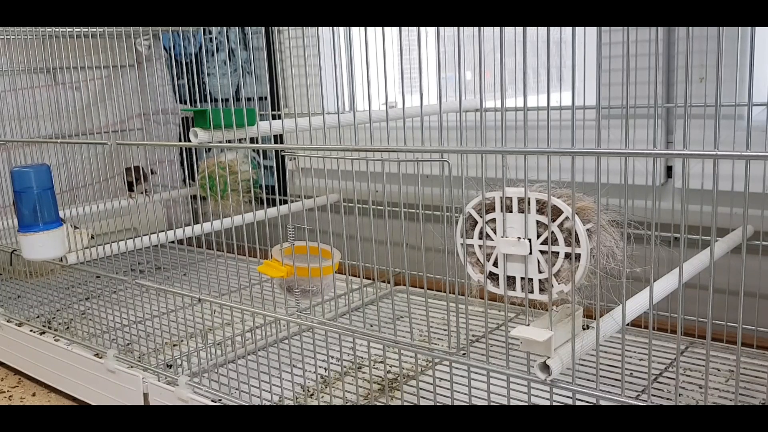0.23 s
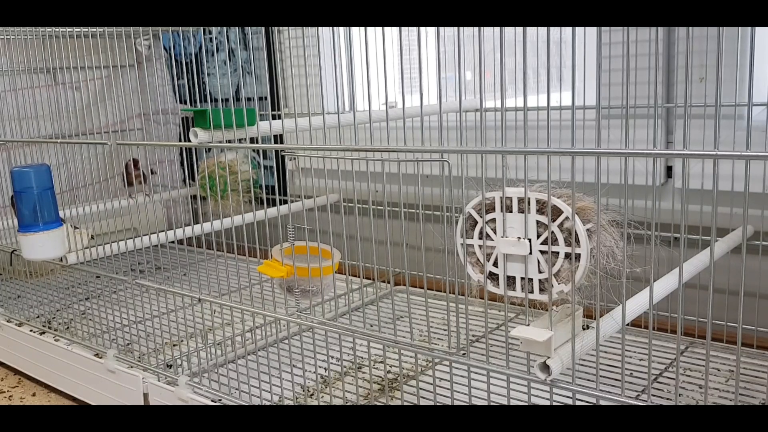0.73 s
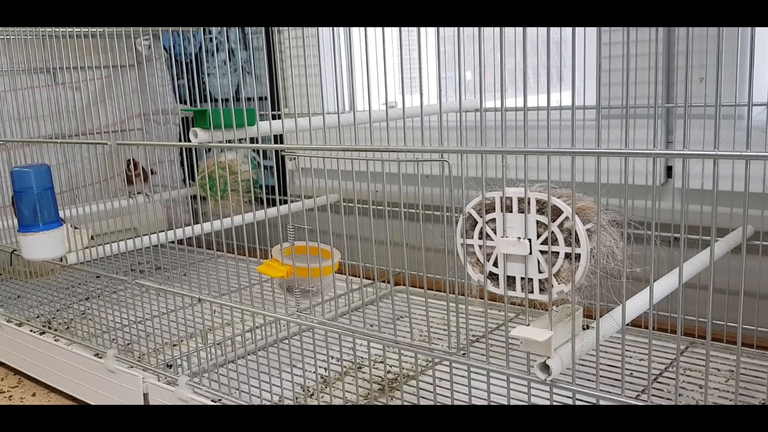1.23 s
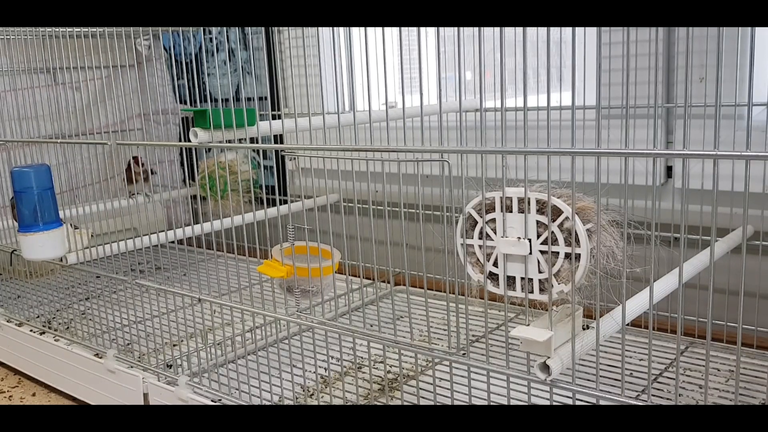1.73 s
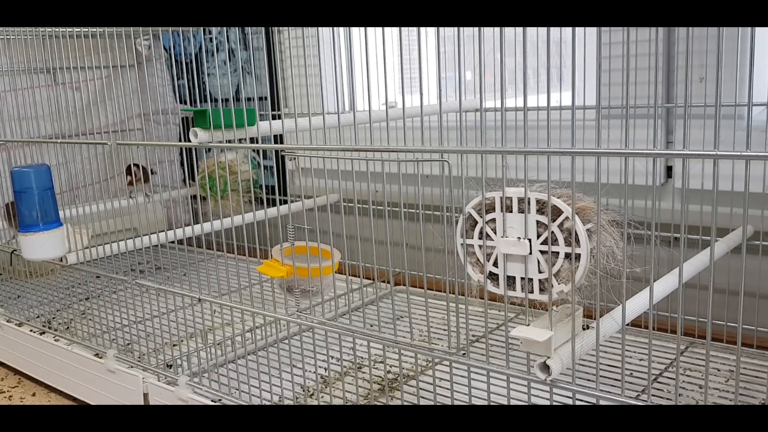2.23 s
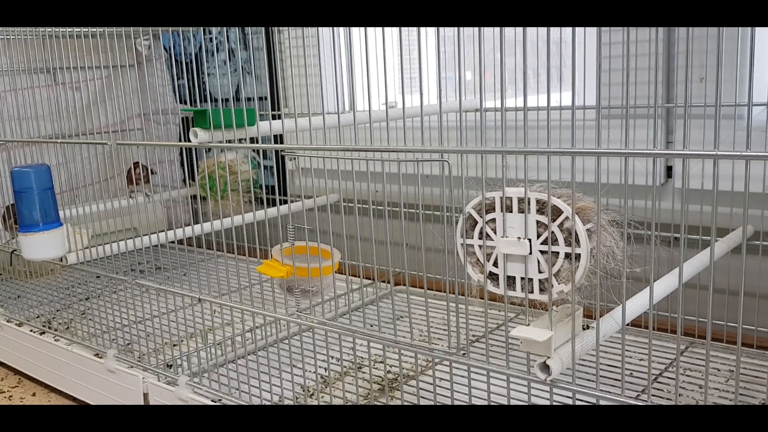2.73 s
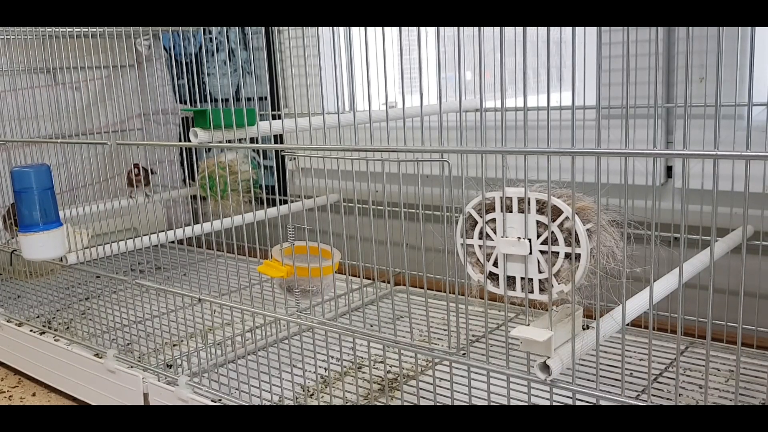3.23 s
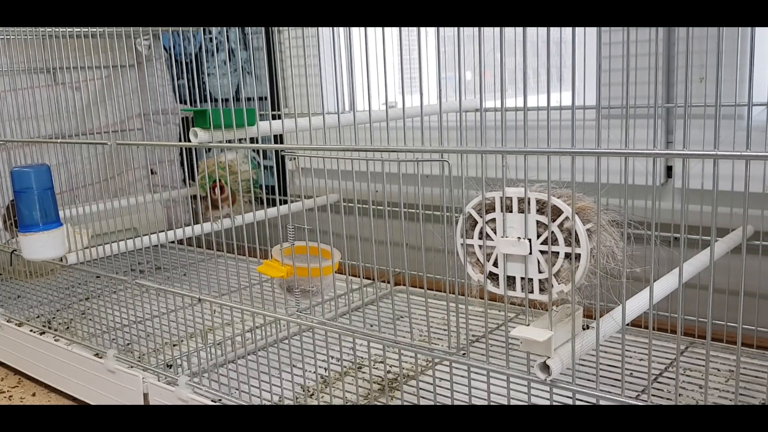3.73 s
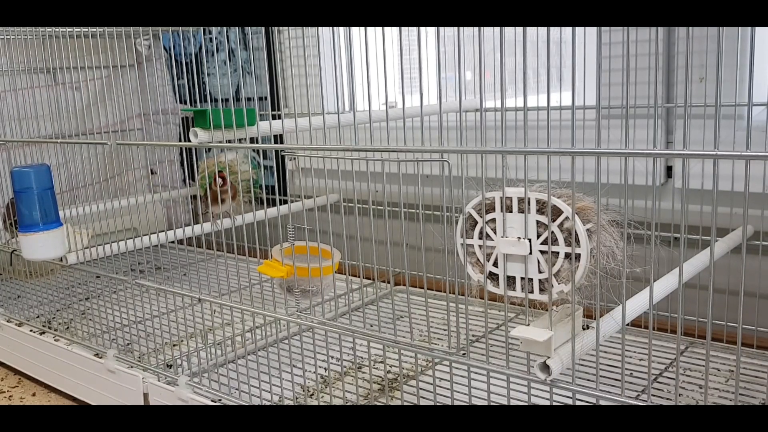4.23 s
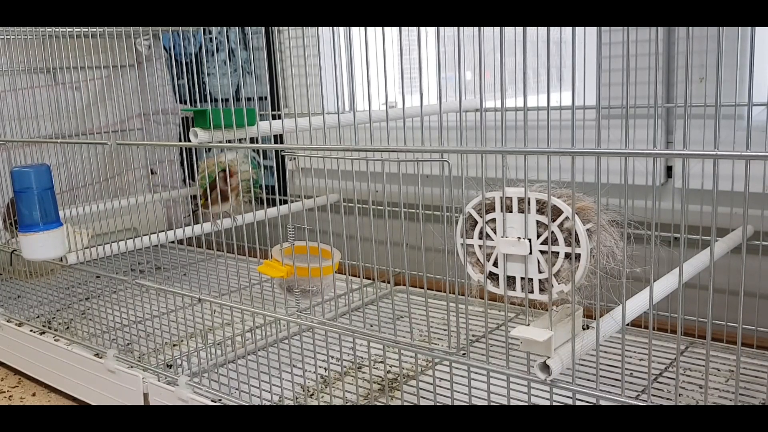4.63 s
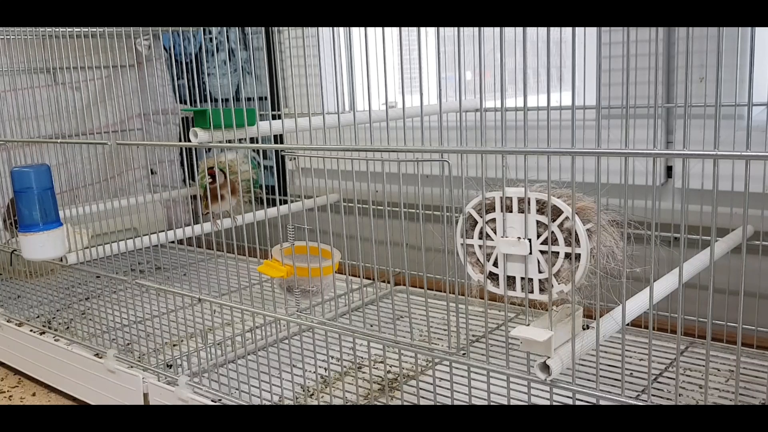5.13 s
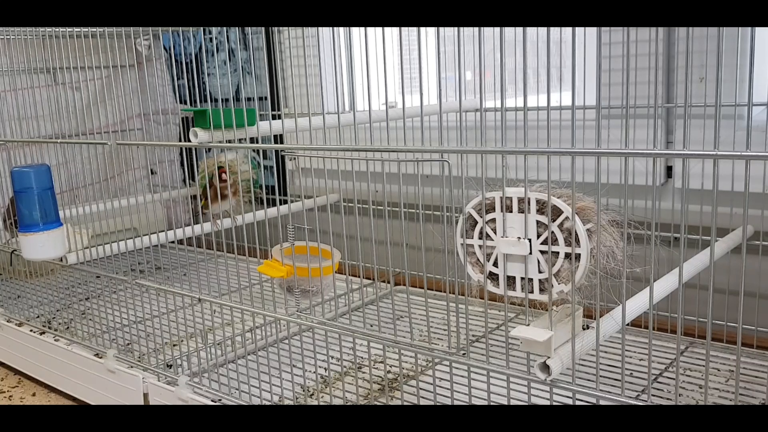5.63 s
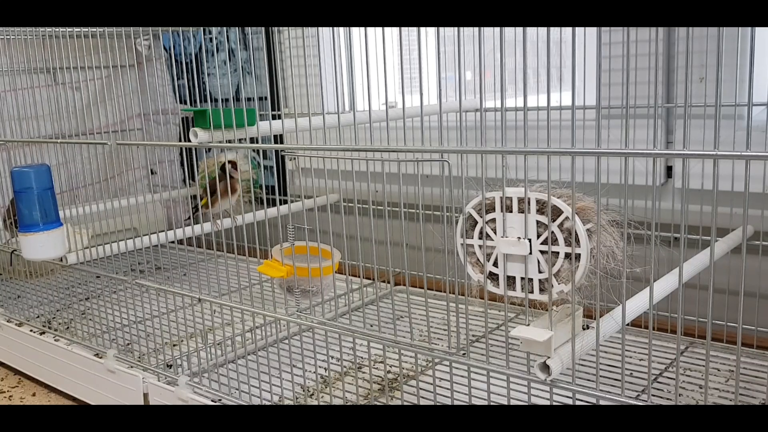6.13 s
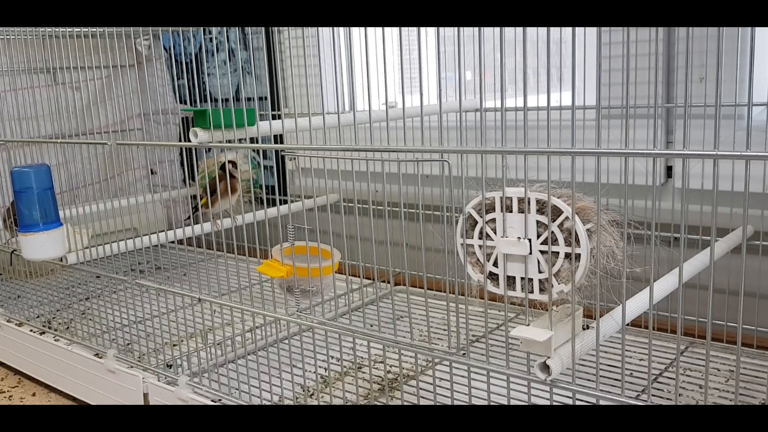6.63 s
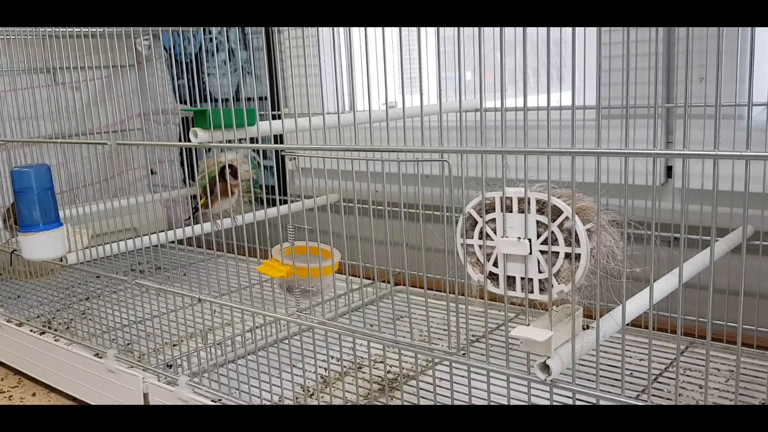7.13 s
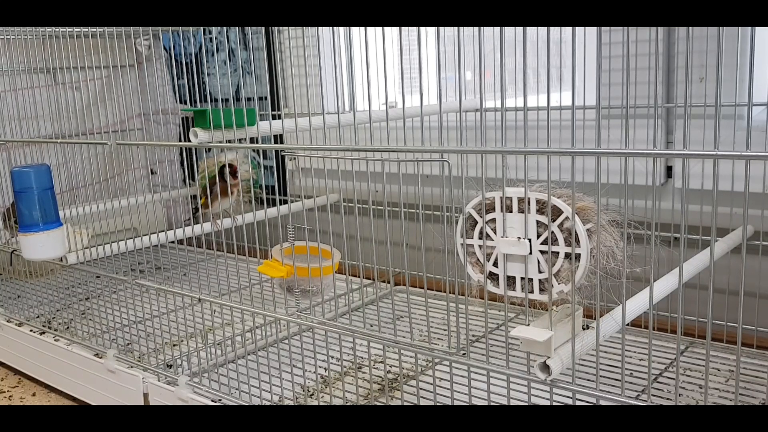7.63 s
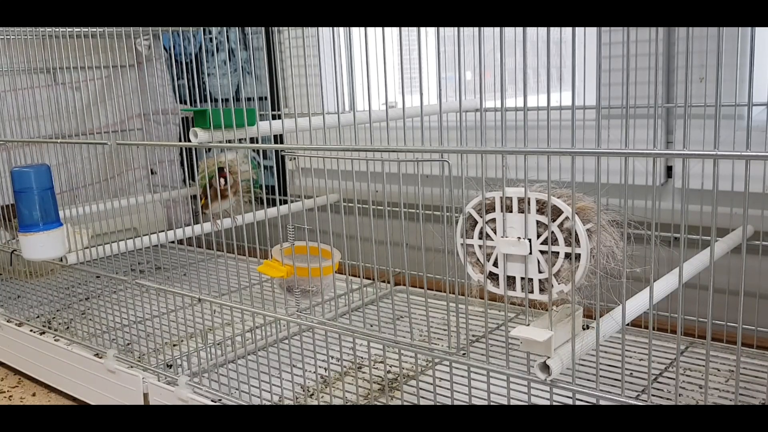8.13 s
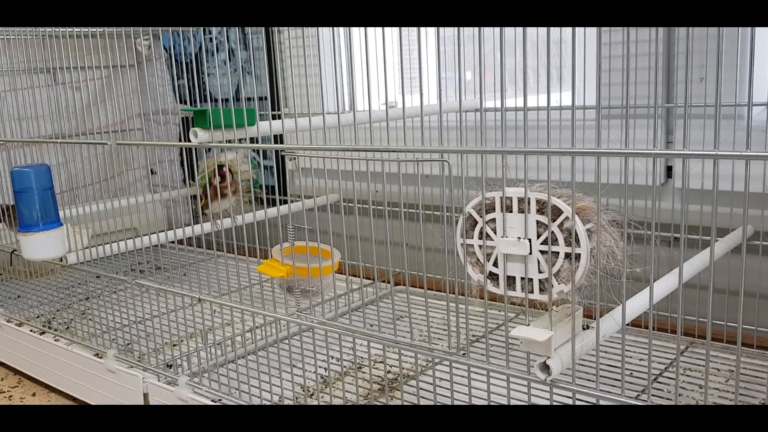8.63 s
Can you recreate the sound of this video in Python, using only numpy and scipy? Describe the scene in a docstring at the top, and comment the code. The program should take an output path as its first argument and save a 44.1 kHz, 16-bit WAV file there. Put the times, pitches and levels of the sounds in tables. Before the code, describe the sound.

Indoors, a small songbird delivers dense, high, pure whistled notes, many gliding upwards, some diving, at times two at once. Short repeated syllables form fast trills; one hoarse descending wheeze breaks the flow. After about six seconds it grows softer and sparser, with low chatter, a couple of sharp chirps and a few closing two-note calls. Wings swish very faintly and feet brush wire. Hard walls smear the song in stereo over low hum and soft air.

```python
"""In a small, bare room a goldfinch twitters in a wire cage over a faint mains hum.
Learnt syllables form trills, with single whistled glides between: near-sines with weak overtones.
The two sides of the syrinx often sing at once and modulate each other; sparse echoes smear the notes.
Now and then wings flutter and feet rattle the cage: enveloped, coloured noise.
Hum is two slowly wavering sines; room air is coloured noise, partly alike in both ears."""
import sys
import numpy as np
from scipy import signal
from scipy.fft import rfft, irfft
from scipy.io import wavfile

SR = 44100
rng = np.random.default_rng(int(sys.argv[2]) if len(sys.argv) > 2 else 0)


def put_to_file(sound):
    """Save the sound as 16-bit audio at rate SR, in the file named by the first command-line argument."""
    columns = np.atleast_2d(sound).T  # one column per channel
    safe = np.clip(columns, -1, 1)
    whole_steps = np.round(safe * 32767)
    wavfile.write(sys.argv[1], SR, whole_steps.astype(np.int16))


N = 392490

# Sweep, climbs all the way: (start / middle pitch [ratio], end / middle pitch [ratio],
# swell from start to end [dB], octave overtone [dB])
SWEEP_SHAPE = (0.64, 1.31, -3.5, -25)


def from_db(db):
    """Decibels to gain."""
    return 10 ** (np.asarray(db) / 20)


def unit(x):
    """Scales to an rms of 1."""
    return x / np.sqrt(np.mean(x ** 2) + 1e-20)


def along(points, hz):
    """Reads (Hz, value) points on a log-frequency axis."""
    point_hz, value = np.transpose(points)
    return np.interp(np.log(hz + 1), np.log(point_hz + 1), value)


def add(mix, s, sound):
    """Lays a sound into the mix at s seconds."""
    part = mix[max(round(s * SR), 0):][:len(sound)]
    part += sound[:len(part)]


def noise(spectrum):
    """Noise of rms 1 with the given colour."""
    hz = np.fft.rfftfreq(N, 1 / SR)
    colour = from_db(along(spectrum, hz))
    return unit(irfft(rfft(rng.standard_normal(N)) * colour, N))


def wander(rate_hz):
    """A smooth random curve of rms 1."""
    hz = np.fft.rfftfreq(N, 1 / SR)
    lowpass = np.exp(-(hz / rate_hz) ** 2)
    return unit(irfft(rfft(rng.standard_normal(N)) * lowpass, N))


def song(jitter=0.0064, jitter_hz=500, third_db=-32, rasp_db=-38, rasp_hz=1160, coupling_db=-16):
    """Each note is a near-pure gliding whistle, with weak overtones and a little rasp."""
    # Throat and beak response to overtones: (frequency [Hz], gain [dB])
    beak = [(4000, 10), (7800, 4.5), (9300, -1.5), (11500, 10), (14000, -4)]
    # Buzz of the long falling wheeze and soft chatter:
    # (time [s], extra rms pitch jitter [share of pitch])
    buzz = [(3.29, 0.00075), (3.36, 0.026), (3.6, 0.048), (3.9, 0.0017), (6.2, 0.0051), (6.36, 0.03),
            (7.02, 0.04), (7.15, 0.0073)]
    out, solo_power = np.zeros(N), np.zeros(N)
    rasp = wander(rasp_hz)
    jitter_share = jitter + np.interp(np.arange(N) / SR, *np.transpose(buzz))
    tremble = jitter_share * wander(jitter_hz)
    for s, hz, loudness, overtone_db in notes():
        at = (round(s * SR) + np.arange(len(hz))) % N
        phase = 2 * np.pi * np.cumsum(hz * (1 + tremble[at])) / SR
        tone = np.sin(phase) * (1 + from_db(rasp_db) * rasp[at])
        for k, partial_db in enumerate([overtone_db, third_db], 2):
            gain = from_db(partial_db + along(beak, k * hz))
            tone += gain * np.sin(k * phase) * (k * hz < SR / 2)
        note = loudness * tone
        add(out, s, note)
        add(solo_power, s, note ** 2)
    # two voices sounding together modulate each other; the throat passes their sum tone best
    sum_tone_highpass = signal.butter(1, 6000, "high", fs=SR)
    crossed = signal.lfilter(*sum_tone_highpass, out ** 2 - solo_power)
    return out + from_db(coupling_db) * crossed


def notes():
    """Every note of the song as (s, pitch curve, loudness curve, overtone dB)."""
    return drawn_out_notes() + syllables() + wide_glides() + small_notes() + tsips()


def drawn_out_notes():
    """A falling wheeze and a low whistle: two long notes on free pitch curves."""
    # Both: (time [s], pitch [Hz], level [dB])
    wheeze = [(3.271, 8900, -33), (3.295, 7370, -33.5), (3.33, 6183, -29), (3.41, 5300, -23.5),
              (3.47, 4600, -27.5), (3.53, 4093, -36), (3.6, 3184, -40), (3.66, 2935, -45)]
    whistle = [(5.02, 2120, -48), (5.065, 2442, -35), (5.12, 2584, -34), (5.21, 2742, -35),
               (5.28, 2750, -33), (5.39, 2747, -28), (5.46, 2752, -40)]
    return [drawn_out(wheeze, overtone_db=-27), drawn_out(whistle, overtone_db=-45)]


def syllables():
    """Learnt syllables, repeated as trills or sung alone with small changes of effort and pitch."""
    # One row per note of the syllable: (delay [s], length [s], start pitch [Hz], middle pitch [Hz],
    # end pitch [Hz], relative level [dB], swell from start to end [dB], octave overtone [dB]);
    # pitches are before the pitch factor
    zip_tink = [(0, .018, 4475, 6170, 7910, -22.5, -8, -27.5),
                (.029, .019, 6810, 6477, 6650, -20, 1, -22.5)]
    tick_coo = [(0, 0.0089, 5940, 4780, 5100, -15.5, 1.9, -31.5),
                (.015, 0.0179, 3757, 3550, 3400, -22.5, 2.4, -30)]
    rising_tswee = [(0, .012, 3150, 6330, 6320, -20, -11, -21),
                    (.016, .032, 6370, 7706, 7710, -22.5, 20, -36)]
    see_tiu = [(0, .038, 6000, 8050, 7750, -22.5, -1, -32), (.035, .062, 6840, 5650, 5800, -22, 27, -34),
               (.041, .026, 5420, 4390, 4660, -25, 4, -18)]
    flick_tink = [(0, .011, 5420, 6670, 9000, -29, 1, -23),
                  (.028, 0.0247, 4256, 3647, 3420, -28.5, -4, -19),
                  (.039, .019, 5460, 5055, 5110, -16.5, -2, -34.5)]
    whit_chew = [(0, .027, 3458, 5007, 5490, -21.5, -6.5, -26.5),
                 (.052, .027, 2108, 3790, 4520, -28, -11, -24.5)]
    # When each is sung: (time [s], added level [dB], pitch factor [ratio])
    zip_tinks = [(.463, -1.5, 1.01), (.582, 1.5, .995), (.704, 0, .997), (.826, 0, 1.002)]
    tick_coos = [(1.346, 1, 1.003), (1.416, -0.4, 1), (1.481, 1, .998), (1.555, -0.84, 1.01),
                 (1.628, 1, 1.003), (1.701, -1.2, 1.02), (1.773, -0.08, .99)]
    rising_tswees = [(2.456, -1.2, 1), (2.643, -0.75, 1), (3.154, 0.92, .988)]
    see_tius = [(2.75, 0, .998), (2.938, 0, 1.003)]
    flick_tinks = [(4.639, 0, 0.99), (4.731, 0, 1.002), (4.827, 0, 1), (4.915, 0, 1.01), (5.006, 0, .998),
                   (5.109, 0, 1.002)]
    whit_chews = [(4.402, -0.8, 1.005), (4.588, 0.5, .995), (4.79, -1.6, 0.98), (5.527, 0.87, 0.98),
                  (8.305, 1, 1.005), (8.499, 0.6, 1), (8.718, 0.31, 1.012)]
    sung = []
    for syllable, repeats in [(zip_tink, zip_tinks), (tick_coo, tick_coos),
                              (rising_tswee, rising_tswees), (see_tiu, see_tius),
                              (flick_tink, flick_tinks), (whit_chew, whit_chews)]:
        for s, effort_db, pitch in repeats:
            for delay_s, length_s, start_hz, middle_hz, end_hz, db, swell_db, overtone_db in syllable:
                sung.append(glide(s + delay_s, length_s, pitch * start_hz, pitch * middle_hz,
                                  pitch * end_hz, db + effort_db, swell_db, overtone_db))
    return sung


def wide_glides():
    """Single improvised glides; a width exponent stretches the start ratio and end ratio."""
    # Shapes: (start / middle pitch [ratio], end / middle pitch [ratio],
    # swell from start to end [dB], octave overtone [dB])
    chup = (0.59, 1.07, -2.5, -28)  # climbs quickly and levels off
    chirp = (0.75, 1.2434, -3, -24.5)  # climbs all the way, less widely than a sweep
    churr = (.5, 1.15, 6, -24)  # soft, low chatter that swells as it climbs
    # Notes: (time [s], length [s], middle pitch [Hz], width [share of its kind's], level [dB])
    chups = [(.148, .033, 3590, 1, -33), (.414, .031, 3840, 1.2, -27.5), (.444, .025, 3240, .8, -25),
             (.538, .02, 4060, .8, -21.5), (.66, .02, 4020, 1.1, -23), (.784, .025, 3920, .9, -22.5),
             (.952, .014, 6300, .9, -18), (1.157, .03, 3920, 1.25, -23.5), (1.515, .028, 3900, .8, -25.5),
             (1.781, .019, 3800, .8, -23.5), (2.098, .032, 8080, .75, -28), (2.25, .052, 5120, 1.05, -26.5),
             (2.403, .029, 3320, .9, -32), (2.589, .021, 3320, 1.05, -30), (2.873, .03, 3620, .9, -25.5),
             (3.068, .024, 3560, .9, -24), (5.281, .056, 4850, 1.3, -25), (5.882, .049, 4950, 1.2, -24),
             (6.016, .015, 3540, 1.1, -22.5), (6.357, .05, 4250, .8, -29.5), (6.472, .065, 4100, .7, -33)]
    chirps = [(.232, .02, 4100, .9, -31), (.707, .018, 4560, 1.2, -20.5), (.904, .032, 4040, 1, -23),
              (1.203, .04, 6370, 1.2, -22.5), (1.238, .026, 8000, 1.2, -28),
              (1.342, .024, 2340, 1.05, -37.5), (1.5, .031, 2400, 1.1, -38), (1.637, .019, 4350, .9, -21),
              (1.678, .038, 3650, 1.2, -29), (1.872, .03, 3900, 1.1, -24), (2.034, .023, 2820, .8, -29),
              (3.807, .017, 2740, 1.1, -32.5), (4.119, .021, 2660, .7, -31.5), (4.413, .022, 2800, .7, -33),
              (5.689, .022, 2920, 1, -31), (5.974, .031, 2930, .8, -31), (6.129, .042, 7620, .5, -42)]
    sweeps = [(.058, .02, 2400, .6, -35), (.24, .017, 2370, .6, -35.5), (1.02, .06, 4550, 1, -22),
              (2.232, .066, 3950, .85, -27), (4.319, .021, 5750, 1, -27), (5.796, .02, 3400, .9, -25.5),
              (6.113, .013, 6000, .95, -28)]
    churrs = [(6.597, .024, 2950, 1.05, -40), (6.708, 0.029, 2900, 1, -38), (6.817, 0.036, 3280, 1, -32.5),
              (6.921, .029, 3550, .85, -33.5), (6.985, .034, 3550, .9, -32.5), (7.615, .02, 3700, .75, -33),
              (7.85, .025, 3040, 1, -39), (7.965, .075, 3920, 1.35, -38), (8.089, 0.021, 3020, 1.15, -37.5)]
    sung = []
    for (start, end, swell_db, overtone_db), rows in [(chup, chups), (chirp, chirps),
                                                     (SWEEP_SHAPE, sweeps), (churr, churrs)]:
        for s, length_s, hz, width, db in rows:
            sung.append(glide(s, length_s, start ** width * hz, hz, end ** width * hz,
                              db, swell_db, overtone_db))
    return sung


def small_notes():
    """Single improvised notes that keep the shape of their kind."""
    # Shapes: (start / middle pitch [ratio], end / middle pitch [ratio],
    # swell from start to end [dB], octave overtone [dB])
    flick = (.84, 1.42, -2, -25.5)  # a flash upwards in the treble
    pip = (0.88, 1.09, -3, -29)  # climbs a little
    tink = (1.11, 1.05, -2, -24)  # settles from just above
    slur = (1.17, 0.87, -3, -25.5)  # falls steadily
    # Notes: (time [s], length [s], middle pitch [Hz], level [dB])
    flicks = [(.899, .014, 6650, -22), (4.217, .009, 6200, -28.5), (4.512, 0.01, 6000, -32),
              (5.672, .013, 7320, -27.5), (5.888, 0.018, 6830, -24.5)]
    pips = [(.224, 0.017, 5040, -22.5), (0.597, 0.012, 3194, -24), (.838, .022, 2860, -25),
            (1.085, .018, 6600, -24), (1.158, .016, 2880, -23.5), (1.829, 0.047, 3156, -30),
            (1.933, 0.019, 4740, -24), (3.888, 0.0207, 3370, -29.5), (4.224, .026, 3520, -27),
            (4.524, .024, 3574, -27), (5.405, .03, 2960, -34.5), (5.453, .019, 4510, -18.5),
            (6.036, .021, 4490, -20), (6.732, .02, 3610, -37.5), (7.121, .021, 3350, -38),
            (8.228, .029, 3140, -43.5), (8.43, .019, 3744, -34.5)]
    tinks = [(.291, .012, 5010, -21), (1.576, 0.015, 5270, -19.5), (4.348, .02, 5156, -24.5),
             (5.229, .022, 6060, -27), (5.732, .026, 5910, -22.5), (5.938, .023, 4760, -22),
             (5.955, .026, 5940, -23), (6.217, 0.0334, 5460, -39), (7.225, 0.0055, 6830, -36),
             (7.225, 0.012, 5460, -33.5), (8.584, .012, 5700, -32.5)]
    slurs = [(.923, 0.035, 7630, -26), (3.865, 0.016, 4980, -33.5), (5.695, 0.026, 7640, -30.5),
             (5.715, 0.062, 4520, -22), (5.921, .023, 7640, -35), (7.36, 0.019, 6070, -18),
             (7.465, 0.036, 5180, -24.5)]
    sung = []
    for (start, end, swell_db, overtone_db), rows in [(flick, flicks), (pip, pips),
                                                     (tink, tinks), (slur, slurs)]:
        for s, length_s, hz, db in rows:
            sung.append(glide(s, length_s, start * hz, hz, end * hz, db, swell_db, overtone_db))
    return sung


def tsips(top_hz=8820, end_ratio=1.04, swell_db=-2.5, overtone_db=-22.5):
    """Notes that dive from the top of the voice, each to its own pitch."""
    # (time [s], length [s], landing pitch at the middle [Hz], level [dB])
    dives = [(0.113, 0.04, 5766, -22), (.303, .041, 5580, -22), (1.268, .044, 6790, -26.5),
             (1.405, .049, 6370, -24.5), (1.558, .04, 6410, -27), (2.126, 0.065, 6406, -24.5),
             (3.989, .059, 5230, -27), (5.225, 0.018, 7150, -24), (5.819, 0.035, 7200, -24.5)]
    return [glide(s, length_s, top_hz, hz, end_ratio * hz, db, swell_db, overtone_db)
            for s, length_s, hz, db in dives]


def glide(s, length_s, start_hz, middle_hz, end_hz, db, swell_db, overtone_db,
          voice_top_hz=8800, top_firmness=40):
    """A short note: the pitch bends through three points under one arch of breath."""
    # Throat response to the note itself: (pitch [Hz], gain [dB])
    throat = [(1500, -1), (2300, -0.5), (3200, 0), (4500, 0), (6000, 0), (7500, 0), (9000, 0)]
    u = np.linspace(0, 1, max(round(length_s * SR), 64))
    bend = np.polyfit([0, .5, 1], [start_hz, middle_hz, end_hz], 2)
    hz = np.polyval(bend, u)
    # the voice cannot climb past its top; firmness sets how abruptly it is held back
    hz = hz / (1 + (hz / voice_top_hz) ** top_firmness) ** (1 / top_firmness)
    level_db = db + swell_db * (u - .5) + along(throat, hz)
    return s, hz, from_db(level_db) * np.sin(np.pi * u), overtone_db


def drawn_out(curve, overtone_db):
    """A long note that follows a curve of pitch and level."""
    s, hz, db = np.transpose(curve)
    t = np.arange(s[0], s[-1], 1 / SR)
    loudness = from_db(np.interp(t, s, db)) * signal.windows.tukey(len(t), .1)
    return s[0], np.interp(t, s, hz), loudness, overtone_db


def wings(beat_hz=22, depth=0.71, level_db=-6):
    """Every wingbeat gives a soft swish of feathers and a low push of air."""
    # Wingbeat bursts: (time [s], length [s], relative swish level [dB], relative push level [dB])
    flutters = [(-.08, 0.11, -37.5, -72), (1.084, 0.22, -49.5, -49.5), (2.078, 0.2, -53, -52),
                (3.402, 0.21, -53.5, -67), (3.767, 0.12, -56.5, -55), (4.778, 0.22, -47.5, -78),
                (5.984, 0.37, -60, -69), (7.065, 0.21, -53.5, -78), (8.45, 0.09, -61, -78)]
    # Colours of feather swish and air push: (frequency [Hz], relative level [dB per Hz])
    swish_colour = [(40, -25), (130, -5.5), (300, 1), (600, -4.5), (1200, -9), (2500, -5), (6000, -14),
                    (14000, -28)]
    push_colour = [(20, -5), (80, -3.5), (150, -6), (400, -26), (2000, -76)]
    t, swish, push = np.arange(N) / SR, np.zeros(N), np.zeros(N)
    for s, length_s, swish_db, push_db in flutters:
        arch = np.sin(np.pi * np.clip((t - s) / length_s, 0, 1))
        beats = arch * (1 - depth * np.cos(2 * np.pi * beat_hz * (t - s)))
        swish += from_db(swish_db) * beats
        push += from_db(push_db) * beats
    return from_db(level_db) * (swish * noise(swish_colour) + push * noise(push_colour))


def scuffs(grain_db=4, grain_hz=490, level_db=-5):
    """Feet and feathers brush the wires: grainy noise with sudden onsets and exponential decays."""
    # Brushes: (time [s], relative level [dB], decay [s])
    brushes = [(1.643, -33, 0.06), (2.697, -30.5, 0.0037), (3.443, -36, 0.016), (3.465, -26.5, 0.0091),
               (3.872, -37.5, 0.014)]
    # Colour of the wires: (frequency [Hz], relative level [dB per Hz])
    wires = [(400, -32), (1500, -9), (3000, 5.5), (4500, 4), (8000, 5), (10000, -1), (13000, -1),
             (15000, -22)]
    t, level = np.arange(N) / SR, np.zeros(N)
    for s, db, decay_s in brushes:
        level += from_db(db) * (t >= s) * np.exp(-abs(t - s) / decay_s)
    grain = unit(from_db(grain_db * wander(grain_hz)))
    return from_db(level_db) * level * grain * noise(wires)


def room(x, direct_db=0.0, wet_db=8.0, beam_hz=8000, turn_s=1.692, count=3):
    """The bird is across the cage, so echoes outweigh the direct sound; they shift as it turns."""
    t = np.arange(N) / SR
    wet = 0
    for k in range(count):
        facing = np.sqrt(2 / count) * np.cos(np.pi * (t / turn_s + k / count))
        wet = wet + signal.fftconvolve((facing * x)[None], echoes(), axes=1)[:, :N]
    # the beak beams the overtones past the microphone
    near = signal.lfilter(*signal.butter(3, beam_hz, fs=SR), x)
    # direct sound reaches the right 4 samples late
    direct = np.array([near, np.r_[np.zeros(4), near[:-4]]])
    return from_db(direct_db) * direct + from_db(wet_db) * wet


def echoes(first_s=.002, early_db=4, early_s=.045, dense_s=0.14, shared_hz=350, size=32768):
    """One room response per ear: sparse strong reflections from near walls thicken into a tail."""
    # Reverberation time: (frequency [Hz], t60 [s])
    t60 = [(200, 0.58), (1500, 0.98), (4000, 0.6), (7000, 0.49), (12000, 0.52)]
    t = np.arange(size) / SR
    density = np.clip(.02 + (t / dense_s) ** 2, 0, 1)
    signs = rng.choice([-1, 1], (2, size))
    present = rng.random((2, size)) < density
    taps = signs * present / np.sqrt(density)
    taps = taps * (t > first_s) * from_db(early_db * np.exp(-t / early_s))
    hz, frame_s, z = signal.stft(taps, SR, nperseg=256)
    same = np.exp(-(hz / shared_hz) ** 2 / 2)[:, None]  # long waves reach both ears alike
    z[1] = same * z[0] + np.sqrt(1 - same ** 2) * z[1]
    decay = from_db(-60 * frame_s / along(t60, hz)[:, None])
    tail = signal.istft(z * decay, SR, nperseg=256)[1]
    return tail / np.linalg.norm(tail, axis=1, keepdims=True)


def lingering():
    """The room still rings at the opening with a sweep sung just before it."""
    # (time [s], length [s], middle pitch [Hz], level before the echo [dB])
    s, length_s, hz, db = (-.05, .035, 4050, -13)
    start, end, swell_db, overtone_db = SWEEP_SHAPE
    _, pitch_hz, loudness, _ = glide(s, length_s, start * hz, hz, end * hz, db, swell_db, overtone_db)
    note = loudness * np.sin(2 * np.pi * np.cumsum(pitch_hz) / SR)
    tail = signal.fftconvolve(note[None], echoes(), axes=1)[:, round(abs(s) * SR):]
    return np.pad(tail, ((0, 0), (0, N - tail.shape[1])))


def background(air_db=-57, waver_db=1.05, waver_hz=0.93):
    """Slowly wavering hum, a little louder on the left, and room air most alike in the deep bass."""
    # Mains hum: (frequency [Hz], level before waver and balance [dB rms])
    hum_tones = [(100, -73), (199.6, -58.5)]
    # Colour of room air: (frequency [Hz], relative level [dB per Hz])
    air_colour = [(20, -15), (45, 2.5), (90, -8.5), (160, -5), (280, -9.5), (500, -30), (1200, -37),
                  (4000, -18), (9000, -21), (15000, -26)]
    # Left-right likeness of air: (frequency [Hz], likeness [0-1])
    likeness = [(30, 0.98), (150, 0.59), (300, 0.34), (700, 0.75), (8000, 0.25)]
    t, hz, hum = np.arange(N) / SR, np.fft.rfftfreq(N, 1 / SR), np.zeros(N)
    for tone_hz, db in hum_tones:
        hum += np.sqrt(2) * from_db(db) * np.sin(2 * np.pi * (tone_hz * t + rng.random()))
    balance_db = [[1.0], [-1.0]]  # left, right
    hum = hum * from_db(waver_db * wander(waver_hz)) * from_db(balance_db)
    left = noise(air_colour)
    same = np.clip(along(likeness, hz), 0, 1)
    right = irfft(same * rfft(left) + np.sqrt(1 - same ** 2) * rfft(noise(air_colour)), N)
    return hum + from_db(air_db) * np.array([left, right])


def scene():
    """The bird's sounds in the room, over the background."""
    return room(song() + wings() + scuffs()) + background() + lingering()


def record(dry, edge_hz=14950):
    """The recorder's steep band limit."""
    lowpass = signal.firwin(511, edge_hz, window=("kaiser", 9), fs=SR)
    return signal.oaconvolve(dry, lowpass[None], "same")


dry = scene()
out = record(dry)
put_to_file(out)
```